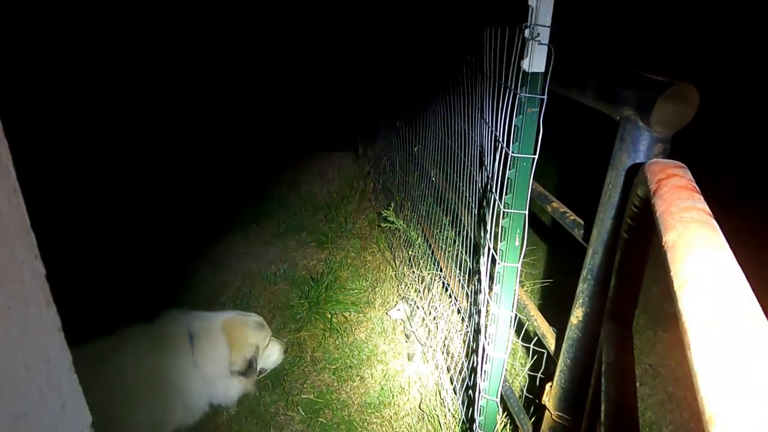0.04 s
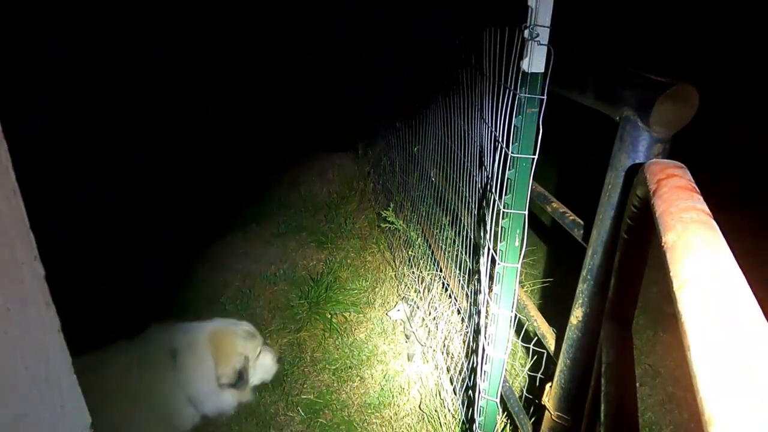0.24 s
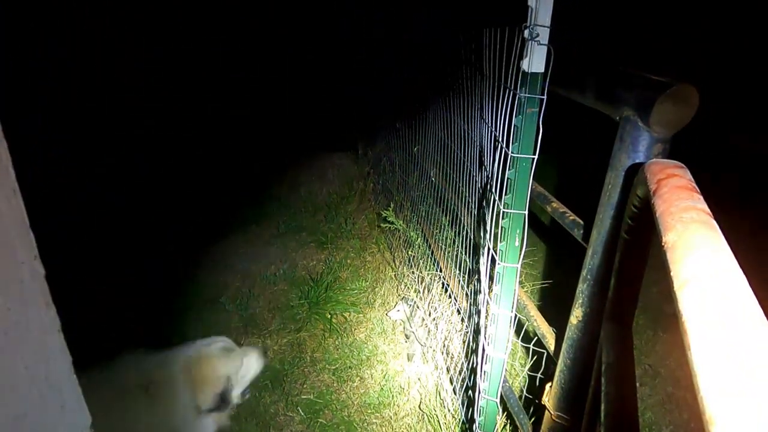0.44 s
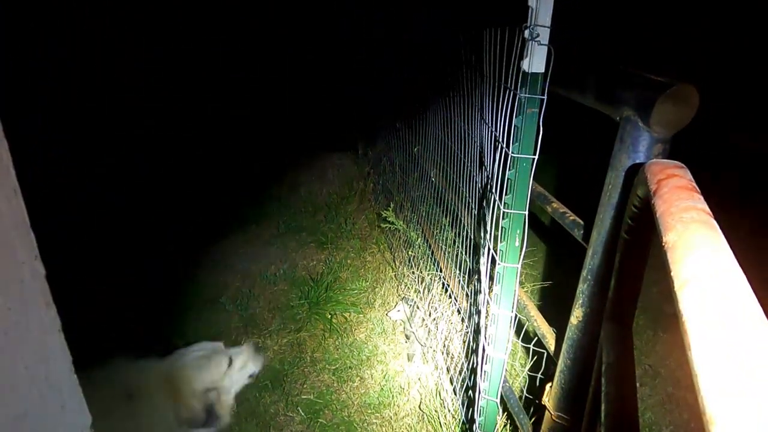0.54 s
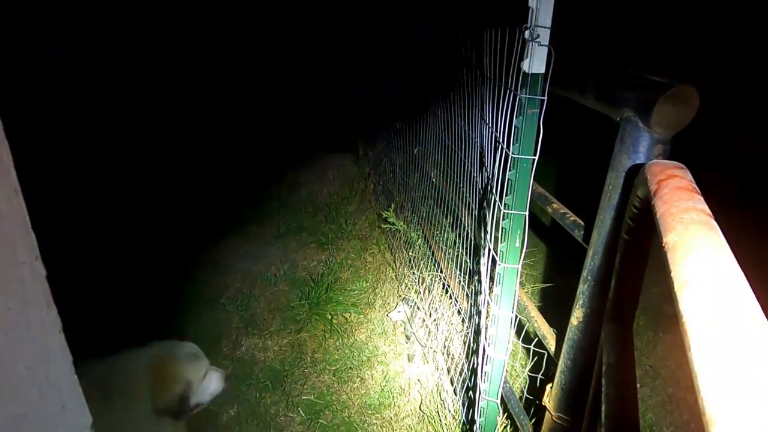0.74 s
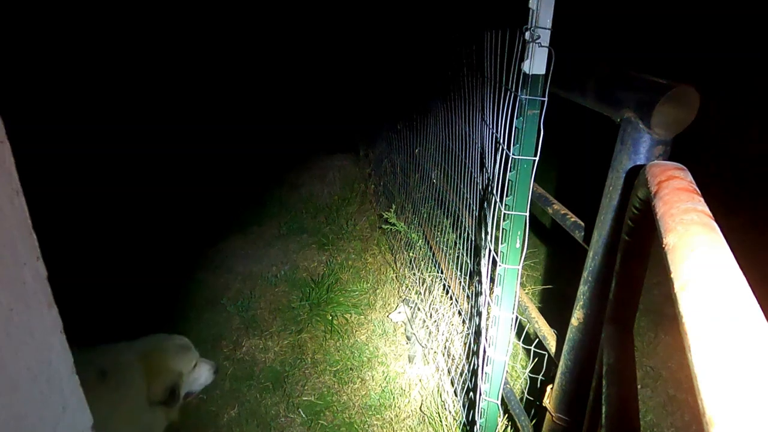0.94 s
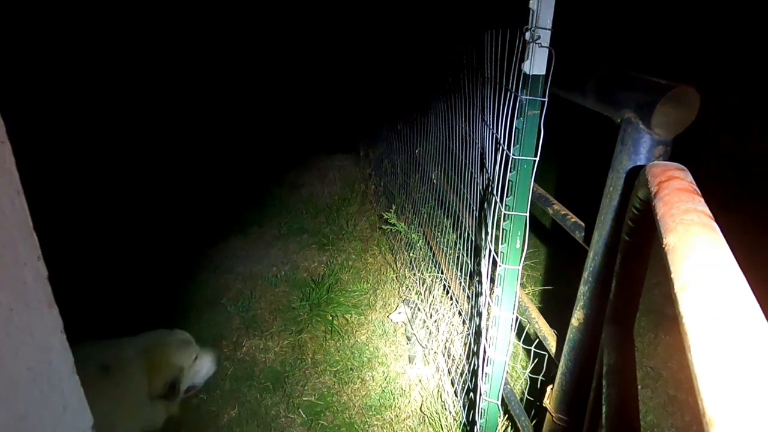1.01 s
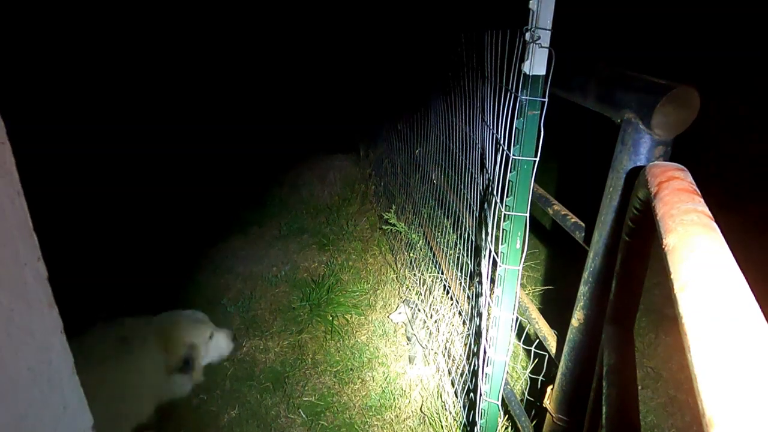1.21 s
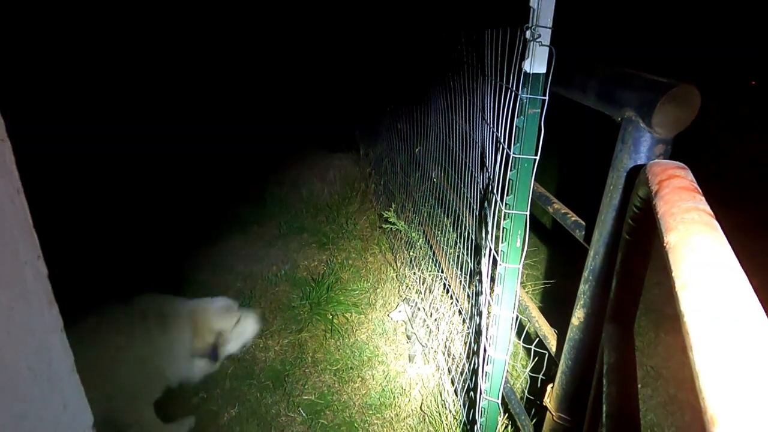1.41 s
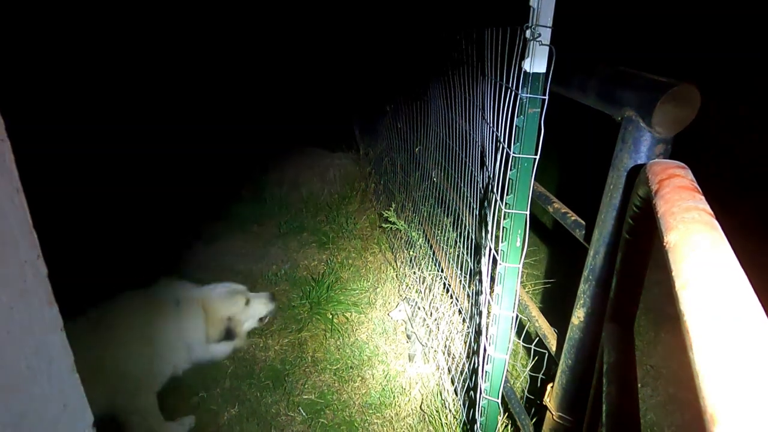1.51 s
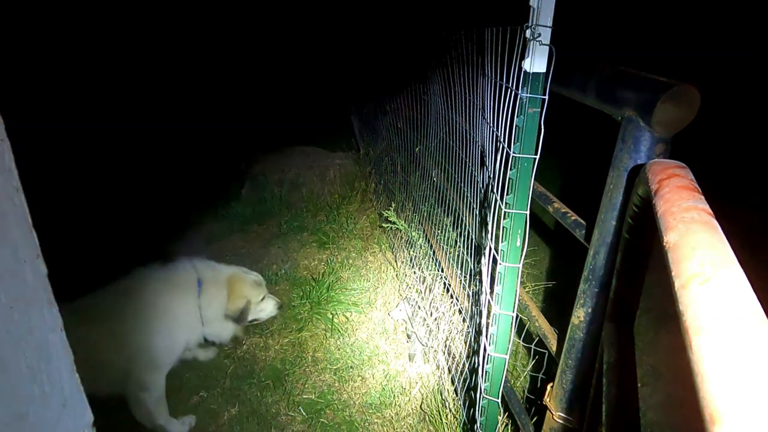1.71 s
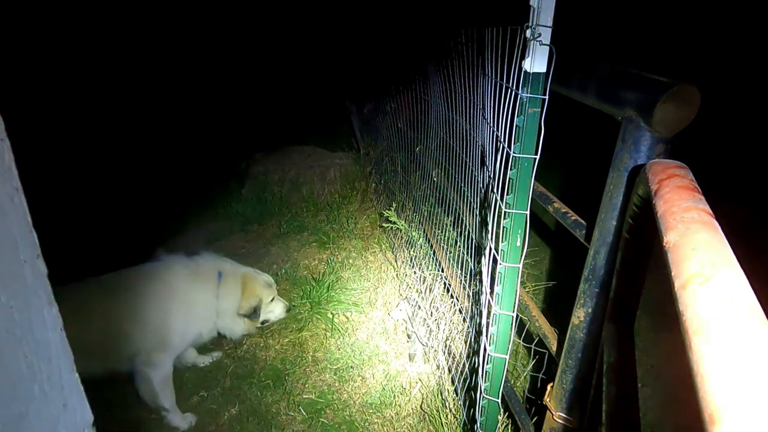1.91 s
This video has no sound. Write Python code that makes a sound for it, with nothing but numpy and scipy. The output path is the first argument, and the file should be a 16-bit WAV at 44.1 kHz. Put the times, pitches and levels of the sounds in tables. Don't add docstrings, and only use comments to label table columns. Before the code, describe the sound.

Two pairs of loud, throaty big-dog barks with low growls between, in a quiet night yard.

```python
import sys
import numpy as np
from scipy import signal
from scipy.fft import rfft, irfft
from scipy.io import wavfile

SR = 44100
rng = np.random.default_rng(int(sys.argv[2]) if len(sys.argv) > 2 else 0)


def amplitude_ratio(level_db):
    exponent = np.asarray(level_db, float) / 20
    return 10 ** exponent


def master_out(mix):
    frames = np.transpose(np.atleast_2d(mix))
    ceiling = np.clip(frames, -1, 1)
    pcm = np.round(ceiling * 32767).astype(np.int16)
    wavfile.write(sys.argv[1], SR, pcm)


N = 85995

# centre in Hz, width in Hz, level in dB.
THROAT_MODES = [(420, 80, 23.5), (722, 70, 15), (1096, 100.5, 24), (1837, 111, 11.5), (2680, 510, -5.5),
                (3440, 540, -9.5), (4260, 540, -2.5), (5630, 700, -12), (6950, 780, -15.5),
                (9500, 3000, -32)]
FLAP_HZ, FLAP_DB = 60, 1
LEFT_RIGHT = np.array([[1], [-1]])


def drift(rate_hz):
    r = np.exp(-2 * np.pi * rate_hz / SR)
    x = signal.lfilter([1], [1, -2 * r, r * r], rng.standard_normal(N + 4000))[4000:]
    return x / x.std()


def track(rows):
    t = np.arange(N) / SR
    times, *columns = np.transpose(rows)
    fade_s = 0.0038
    inside_s = np.minimum(t - times[0], times[-1] - t)
    gate = np.clip(inside_s / fade_s + 1, 0, 1)
    return [np.interp(t, times, column) for column in columns] + [gate]


def peak(x, hz, width):
    r = np.exp(-np.pi * width / SR)
    poles = [1, -2 * r * np.cos(2 * np.pi * hz / SR), r * r]
    return signal.lfilter([(1 - r * r) / 2, 0, (r * r - 1) / 2], poles, x)


def cut(x, hz, kind):
    return signal.sosfilt(signal.butter(2, hz, kind, fs=SR, output="sos"), x)


def voice(rows):
    hz, db, *_, gate = track(rows)
    wobble_rad = 0.19
    phase = 2 * np.pi * np.cumsum(hz) / SR + wobble_rad * drift(FLAP_HZ)
    return phase, np.sqrt(2) * gate * amplitude_ratio(db + FLAP_DB * drift(FLAP_HZ))


def opening(hz):
    return amplitude_ratio(-11) + sum(1 / (1 + ((hz - f) / w) ** 2) for f, w, _ in THROAT_MODES[1:5])


def barks():
    # time in seconds, pitch in Hz, level in dB, breath airflow in dB.
    lows = [[(.15, 259.4, -57, -60.5), (.18, 342.3, -45, -57.5), (0.199, 406.2, -20, -56),
             (0.226, 510.7, -22, -52), (0.244, 572.5, -22.5, -44.5), (0.267, 595, -24, -41),
             (0.286, 573.7, -21, -46.5), (0.311, 391, -16, -52), (0.341, 371.6, -36.5, -55.5)], [(0.486, 341.9, -32.5, -66), (.515, 400.1, -15, -49), (0.544, 447.5, -21.5, -36),
                           (.578, 496, -31, -38.5), (.6, 459.8, -23, -34.5), (.64, 449, -12.5, -44.5),
                           (0.682, 394.8, -9.5, -50), (0.692, 328.6, -30, -61), (0.714, 301, -36.5, -61.5)], [(1.121, 310.7, -44, -60.5), (1.136, 348.7, -34, -52),
                                         (1.144, 411.5, -19.5, -45.5), (1.169, 449.6, -23.5, -42.5),
                                         (1.21, 463.3, -25.5, -39), (1.235, 471.7, -30, -39),
                                         (1.269, 440, -27.5, -45), (1.299, 420, -22.5, -53.5),
                                         (1.326, 420, -38, -58.5)], [(1.491, 261, -46.5, -61.5), (1.525, 308, -28, -42),
                                                       (1.545, 393.8, -21, -38), (1.561, 415.8, -14.5, -42),
                                                       (1.6, 429.2, -15, -45.5), (1.641, 415.7, -16.5, -45),
                                                       (1.658, 345, -19.5, -51.5), (1.683, 273, -39.5, -58)]]
    # time in seconds, pitch in Hz, level in dB.
    highs = [[(0.148, 514.4, -76), (0.16, 537, -38.5), (0.2, 550, -37.5)], [(.52, 551.8, -25), (.54, 672.7, -24), (.558, 826.5, -21.5),
                             (0.589, 815, -16.5), (.63, 814, -17), (0.655, 738.5, -23.5), (.67, 798, -24.5),
                             (.695, 718, -33.5)], [(1.148, 520, -19.5), (1.172, 659.7, -22), (1.212, 686.7, -19.5),
                                            (1.246, 659.6, -16), (1.277, 693.3, -17), (1.295, 674, -36.5),
                                            (1.32, 678, -36)], [(1.53, 601.5, -31.5), (1.56, 656.2, -19.5),
                                                           (1.58, 680, -21), (1.627, 640.5, -17.5),
                                                           (1.645, 640.3, -23), (1.669, 650, -41)]]
    # time in seconds, pitch in Hz, level in dB.
    strays = [[(0.272, 728.6, -34.5), (0.292, 597, -17), (0.31, 462, -21.5)], [(0.511, 1050, -31.5), (0.538, 1305, -27), (0.561, 1312, -39.5),
                               (.59, 1341, -28.5), (0.609, 1368, -33.5)], [(1.158, 895, -30.5), (1.191, 926.8, -16),
                                               (1.216, 927, -24.5), (1.249, 1030, -21), (1.28, 1006, -26.5),
                                               (1.3, 970, -34.5)], [(1.516, 715.7, -33.5), (1.546, 800, -27),
                                                               (1.58, 754, -24.5), (1.6, 720, -27)]]
    mixes = [(2, 0), (3, 0), (5, 0), (6, 0), (0, 2), (0, 3), (0, 5), (1, 1), (-1, 2), (1, 2), (2, 1),
             (0, 1.5), (0, 4 / 3)]
    mix_levels = [
        [-8, -11.5, -35, -36.5, -16, -20.5, -48, -51.5, -26.5, -14.5, -35, -20, -41.5],
        [-25, -27, -33.5, -44.5, -19, -33.5, -27.5, -17, -7, -36, -22, -19, -29],
        [-29.5, -12.5, -27, -42, -19.5, -37.5, -43, -23, -16.5, -37.5, -21, -19, -21],
        [-27.5, -52, -43, -49, -20.5, -33, -39.5, -22, -33.5, -24.5, -38, -17, -33.5],
    ]
    # lower voice in dB, upper voice in dB, over the breath.
    snap_levels = [(-7, -16), (-7.5, -2.5), (-7.5, -5.5), (-15, -6)]
    snap_sharpness, air_pulse, lift_follows_air = 77, 0.22, 0.65

    tones, air, snaps = 0, 0, 0
    for low, high, stray, mix, snap in zip(lows, highs, strays, mix_levels, snap_levels):
        low_phase, low_size = voice(low)
        high_phase, high_size = voice(high)
        stray_phase, stray_size = voice(stray)
        low_hz, _, air_db, gate = track(low)
        high_hz, _, high_gate = track(high)
        tones = tones + low_size * np.sin(low_phase) + high_size * np.sin(high_phase)
        tones = tones + stray_size * np.sin(stray_phase)

        mouth = amplitude_ratio(lift_follows_air * (air_db - air_db.max()))
        for (m, n), db in zip(mixes, mix):
            if n == 0:
                size = low_size
            elif m == 0:
                size = high_size
            else:
                size = np.minimum(low_size, high_size)
            lift = opening(m * low_hz + n * high_hz) * mouth
            unsteady = amplitude_ratio(db + 5.5 + 3.25 * FLAP_DB * drift(FLAP_HZ / 2))
            tones = tones + size * lift * unsteady * np.sin(m * low_phase + n * high_phase)

        air = air + gate * amplitude_ratio(air_db) * (1 + air_pulse * np.sin(low_phase))
        for phase, on, db in zip([low_phase, high_phase], [gate, high_gate], snap):
            closure = np.exp(snap_sharpness * (np.cos(phase) - 1))
            snaps = snaps + on * amplitude_ratio(air_db + db + 9) * closure
    return tones, air, snaps


def growls():
    # time in seconds, pitch in Hz, level in dB.
    growl_tracks = [[(0.325, 158.0, -35.5), (0.417, 108.8, -36), (0.5, 154.8, -43)], [(0.685, 152, -37), (0.787, 67.5, -45.5), (0.85, 57.2, -61.5)], [(1.29, 156.7, -35.5), (1.372, 79.45, -39),
                                                     (1.53, 188.9, -37)], [(1.665, 179.6, -45),
                                                                     (1.694, 163.5, -35.5),
                                                                     (1.74, 103.8, -42.5),
                                                                     (1.782, 74.2, -48.5), (1.82, 62, -58)]]
    orders_db = [3, -20, -7, -7.5, -31.5, -37.5, -29, -23.5, -23.5, -46.5]
    air_under_growl_db, air_pulse = -23.5, 0.34
    tones, air = 0, 0
    for rows in growl_tracks:
        phase, size = voice(rows)
        for k, db in enumerate(orders_db, 1):
            tones = tones + size * amplitude_ratio(db) * np.sin(k * phase)
        air = air + size * amplitude_ratio(air_under_growl_db) * (1 + air_pulse * np.sin(phase))
    return tones, air


def throat(air, snaps):
    patch_db, patch_hz = 4.5, 14
    bright_snaps = cut(cut(snaps, 2100, "high"), 2100, "high")
    source = air * rng.standard_normal(N) + bright_snaps + 1e-18
    out = 0
    for k, (hz, width, db) in enumerate(THROAT_MODES):
        ring = peak(peak(source, hz, 1.64 * width), hz, 1.64 * width)
        out = out + (-1) ** k * amplitude_ratio(db + 8 + patch_db * drift(patch_hz)) * ring
    return out


def nearby(x):
    t = np.arange(SR // 20) / SR
    t60_s = 0.015
    taps = rng.standard_normal(len(t)) * amplitude_ratio(-60 * t / t60_s)
    taps = taps / np.sqrt(np.sum(taps ** 2))
    side = np.convolve(cut(x, 890, "high"), taps)[:N]
    return amplitude_ratio(-9.5) * side * LEFT_RIGHT


def yard(x):
    # delay in seconds, left level in dB, right level in dB.
    echoes = [
        (0.033, -33.5, -27.5),
        (.17, -23, -25.5),
        (0.339, -39, -40),
    ]
    far = cut(x, [800, 4000], "band") + amplitude_ratio(5) * peak(x, 2340, 630)
    out = np.zeros((2, N))
    for delay_s, *db in echoes:
        start = int(delay_s * SR)
        out[:, start:] += amplitude_ratio(np.array(db))[:, None] * far[:N - start]

    t = np.arange(SR) / SR
    t60_s, rise_s = 0.78, 0.03
    scatter = rng.standard_normal((2, SR)) * amplitude_ratio(-60 * t / t60_s) * np.clip(t / rise_s, 0, 1)
    scatter = scatter / np.sqrt(np.sum(scatter ** 2, axis=1, keepdims=True))
    dull = cut(far, 2500, "low")[None]
    return out + amplitude_ratio(-25) * signal.fftconvolve(dull, scatter, axes=1)[:, :N]


def ticks():
    # time in seconds, level in dB.
    snapping = [
        (.365, -59.5),
        (.43, -45),
        (.9165, -41.5),
        (.962, -44.5),
        (1.021, -46.5),
        (1.08, -54),
    ]
    # pitch in Hz, level in dB, 60 dB decay in seconds.
    stalk_modes = [(3700, -3, .006), (5300, 0, .006), (6200, -2, .005), (7700, -4, .004), (9500, -5, .004)]
    out = 0
    for hz, db, t60 in stalk_modes:
        clicks = np.full(N, 1e-18)
        for s, peak_db in snapping:
            clicks[int(s * SR)] = amplitude_ratio(peak_db + db - 14.5 + rng.normal(0, 1.5))
        r = amplitude_ratio(-60 / (t60 * SR))
        w = 2 * np.pi * hz / SR
        out = out + signal.lfilter([0, np.sin(w)], [1, -2 * r * np.cos(w), r * r], clicks)
    return out * amplitude_ratio(2 * LEFT_RIGHT)


def wind():
    # time in seconds, level in dB.
    gust = [
        (0.0, -72.5),
        (0.244, -48),
        (1.95, -69),
    ]
    gust_hz = 71.4
    db, _ = track(gust)
    rumble = cut(rng.standard_normal((2, N)), gust_hz, "low")
    rumble = cut(rumble, 2.0 * gust_hz, "low")
    mid, side = cut(rumble, 60, "high")
    return amplitude_ratio(db - 1.5 * LEFT_RIGHT) * (mid + .25 * side * LEFT_RIGHT) / mid.std()


def night():
    # frequency in Hz, level in dB.
    night_spectrum = [(59, -27.5), (100, -14), (151, -4.5), (895, -20.5), (1410, -20), (1630, -33.5),
                      (14000, -47)]
    hz = np.arange(N // 2 + 1) * SR / N + 1
    f, db = np.transpose(night_spectrum)
    shape = amplitude_ratio(np.interp(np.log(hz), np.log(f), db))
    mid, side = irfft(rfft(rng.standard_normal((2, N))) * shape, N)
    both = cut(mid + .4 * side * LEFT_RIGHT, 7000, "low")
    return amplitude_ratio(-59.5 + 0.5 * drift(14)) * both / mid.std()


def scene():
    bark_tones, bark_air, snaps = barks()
    growl_tones, growl_air = growls()
    dog = bark_tones + growl_tones + throat(bark_air + growl_air, snaps)
    direct = dog * amplitude_ratio(-0.18 * LEFT_RIGHT)
    return direct + nearby(dog) + yard(dog) + ticks() + night() + wind()


def low_pass(x):
    return signal.sosfilt(signal.butter(12, 14480, fs=SR, output="sos"), x)


def record(dry):
    return low_pass(dry)


dry = scene()
out = record(dry)
master_out(out)
```